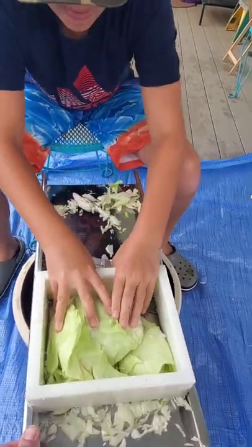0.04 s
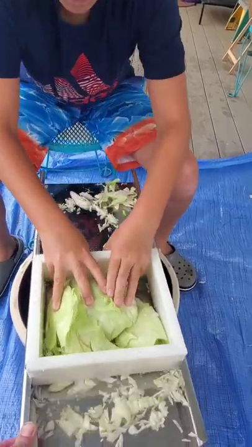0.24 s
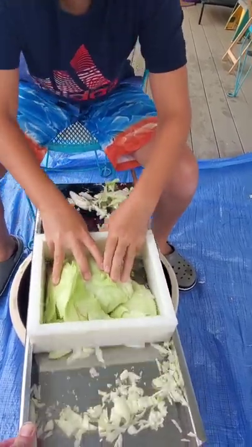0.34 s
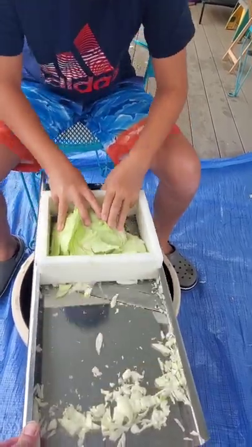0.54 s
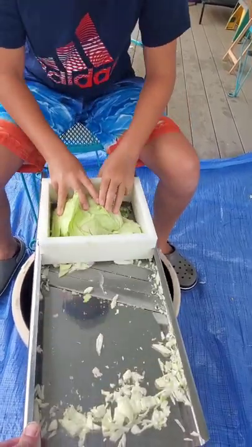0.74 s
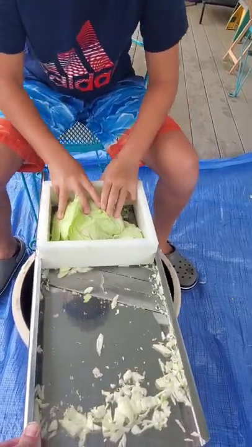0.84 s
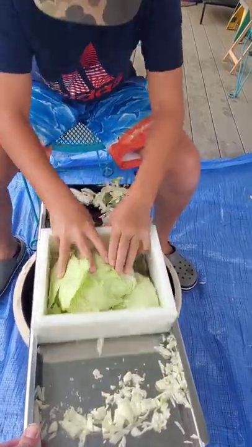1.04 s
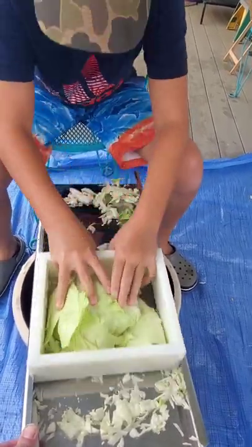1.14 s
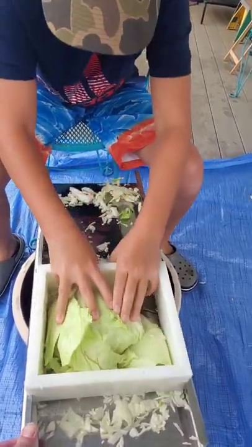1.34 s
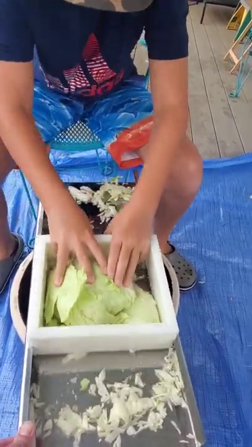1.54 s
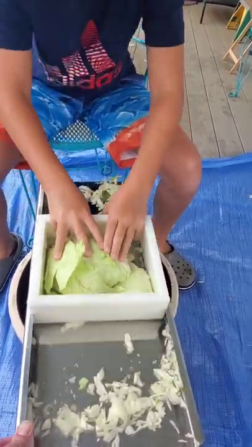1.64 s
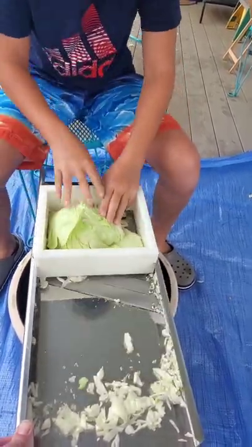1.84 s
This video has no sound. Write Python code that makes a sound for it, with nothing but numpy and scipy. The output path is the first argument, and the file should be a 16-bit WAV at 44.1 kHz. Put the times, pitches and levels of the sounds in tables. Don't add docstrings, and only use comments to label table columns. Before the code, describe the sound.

Cabbage being shredded on a steel slicer, hollow knocks, rough sliding and crisp leafy crackle, close up

```python
import sys
import numpy as np
from scipy import signal
from scipy.fft import rfft, irfft
from scipy.io import wavfile
from scipy.ndimage import uniform_filter1d

SR = 44100
rng = np.random.default_rng(int(sys.argv[2]) if len(sys.argv) > 2 else 0)


def unload_wav(signal):
    wavfile.write(
        sys.argv[1],
        SR,
        np.round(np.clip(np.atleast_2d(signal).T, -1, 1) * 32767).astype(np.int16),
    )


def gain_from_db(level_db):
    decades = np.asarray(level_db, float) / 20
    return 10 ** decades


N = 83790

# time in seconds, slicing crackle in dB, tray rubbing in dB,
# tub rumble in dB, stand sway in dB.
BOX_MOTION = [(0, -45, -30, -32.5, 8.5), (.05, -48.5, -40.5, -41.5, 0), (0.099, -62.5, -44.5, -51, -7.5),
              (.20, -57, -43, -41.5, -4), (0.268, -53, -31, -29, -1), (.42, -50.5, -42, -40.5, 1),
              (.62, -48.5, -41, -40.5, 2.5), (.74, -53.5, -46.5, -42.5, -6), (.81, -65, -54.5, -56, -10.5),
              (0.889, -55, -49.5, -57, -10), (0.955, -39.5, -38.5, -39.5, 2),
              (1.111, -35.5, -30.5, -33.5, 4), (1.268, -43.5, -30.5, -28.5, -2.5),
              (1.363, -70.5, -59, -82, -15), (1.46, -65, -52, -51.5, -3), (1.54, -55.5, -47, -44.5, 0),
              (1.70, -51, -37, -40.5, 2.5), (1.9, -54.5, -56.5, -48, -2.5)]
# start in seconds, level in dB, contact in seconds,
# brightness in dB per octave, pitch of the free span in Hz.
TRAY_KNOCKS = [(.014, -31, 0.011, 7, 855), (.044, -29, 0.0066, 4, 707), (.118, -42, 0.0085, -1, 755),
               (.2235, -9, 0.0097, -2, 664), (.242, -18.5, 0.011, -4, 740), (.257, -23, 0.011, 1, 970),
               (.271, -19, 0.013, -1.5, 810), (.287, -27, 0.0079, -4, 764), (.348, -31, 0.012, 2, 770),
               (.374, -28.5, 0.016, 2.5, 887), (.385, -27, 0.0092, 2, 930), (.439, -31, 0.0082, -4, 920),
               (.494, -29.5, 0.0091, 4.5, 910), (.6025, -19, 0.011, -3, 791),
               (.727, -26.5, 0.0052, 9.5, 806), (.749, -30.5, 0.019, -2, 863), (.829, -41.5, .01, -8, 813),
               (.9035, -22, 0.0078, 4, 865), (.984, -22, 0.0086, 2.5, 757), (.994, -30, 0.0088, 0, 866),
               (1.055, -29, 0.013, 4, 747), (1.083, -21, .007, 0, 724), (1.103, -24.5, .015, 4, 830),
               (1.1275, -4, 0.011, 1.5, 798), (1.158, -17, 0.0047, 6, 736), (1.189, -17.5, 0.014, 0, 925),
               (1.211, -32, 0.012, -1, 756), (1.2518, -16, 0.016, 0.5, 776)]
# start in seconds, level in dB, contact in seconds,
# brightness in dB per octave, pitch of the free span in Hz.
RETURN_TICKS = [(1.375, -37, 0.005, -8, 772), (1.475, -40.5, 0.01, 6, 630), (1.502, -37.5, 0.01, 2, 727),
                (1.521, -34.5, 0.013, 8, 907), (1.573, -32, 0.0091, -4, 776), (1.6, -31, 0.0066, -2, 964),
                (1.626, -33, 0.013, -7, 907), (1.647, -28.5, 0.0095, 1, 746),
                (1.696, -31.5, 0.009, -10, 996), (1.726, -32.5, 0.0066, 2, 718),
                (1.817, -27.5, 0.0069, -2, 818), (1.865, -32.5, 0.014, -12, 823),
                (1.892, -35, 0.011, 4, 861)]
# start in seconds, level in dB, contact in seconds,
# brightness in dB per octave, pitch of the belly in Hz.
TUB_THUMPS = [(0.029, -30, 0.0029, -5, 181), (0.062, -27.5, 0.006, -3, 167), (0.153, -32.5, 0.0035, 0, 178),
              (0.223, -7.5, 0.0039, 2, 173.3), (0.251, -13, 0.004, 5, 162), (0.296, -26.5, 0.0041, -9, 154),
              (0.345, -39.5, 0.0045, 0, 151), (0.508, -23, 0.006, -7, 167), (0.597, -32, 0.0057, 6, 156),
              (0.725, -29.5, 0.0074, -1, 241), (0.987, -21.5, 0.0034, 4.5, 197),
              (1.064, -26.5, 0.0081, 1, 158), (1.099, -18.5, 0.0052, 2, 294),
              (1.128, -12, 0.0034, 1.5, 201), (1.143, -18.5, 0.0037, 7, 155),
              (1.159, -26.5, 0.0021, 11, 150), (1.207, -34.5, 0.0048, 13, 193),
              (1.252, -24, 0.0048, 4, 206.4), (1.313, -35.5, 0.0034, 2, 221), (1.377, -45, 0.003, 10, 324),
              (1.649, -28, 0.0059, 1, 165), (1.825, -27, 0.004, -2, 277), (1.849, -30.5, 0.004, 5, 173)]
# start in seconds, level in dB, length in seconds,
# share of thin crisp cracks from 0 to 1.
LEAF_SNAPS = [(0.088, -42.5, 0.031, 0.8), (0.128, -36.5, 0.026, 0.38), (0.2172, -18, 0.016, 0),
              (0.319, -29, 0.057, 0.2), (0.366, -25, 0.015, 0.1), (0.436, -38, 0.012, 0.3),
              (0.488, -20, 0.018, 0.4), (0.668, -35, 0.0057, 0.94), (0.6837, -29, 0.01, 1),
              (0.7016, -21, 0.016, 0.5), (.815, -47.5, 0.011, 1), (.857, -46, 0.015, 1),
              (1.083, -24.5, 0.027, 0.15), (1.172, -32, 0.014, 0.6), (1.225, -27, 0.011, 0),
              (1.508, -33.5, 0.009, 0.35), (1.591, -34.5, 0.018, 0.1), (1.755, -29, 0.015, 1)]
# centre in seconds, level in dB, pitch in Hz.
STAND_BUMPS = [
    (0.251, -17.5, 69),
    (1.151, -24, 92),
    (1.480, -21.5, 64),
    (1.598, -25.5, 70),
    (1.718, -28, 55.7),
]
# time in seconds, pitch in Hz, level in dB.
RIM_GROAN = [
    (.345, 158, -51),
    (.395, 163, -33),
    (.428, 165.8, -48),
    (.47, 166.3, -40),
    (.53, 163.1, -29.5),
    (.588, 159.6, -43.5),
    (.632, 162.8, -36.5),
    (.7, 184, -49),
]
# time in seconds, resonance in Hz, level in dB.
BLADE_GAP = [
    (1.0, 748, -50),
    (1.035, 950, -37),
    (1.06, 1097, -32.5),
    (1.085, 1397, -31),
    (1.1, 1694, -31.5),
    (1.125, 1920, -50),
]
# frequency in Hz, level in dB, T60 in seconds.
TRAY_MODES = [(690, 1.5, 0.053), (768, 1, 0.067), (862, 4, 0.023), (976, -5, 0.021), (1290, -3.5, 0.024),
              (1449, -3.5, 0.018), (1590, -7.5, 0.036), (1906, -15, 0.03), (2170, -9, 0.016),
              (2380, -12.5, 0.032), (2840, -20.5, 0.039), (2984, -24, 0.06), (4250, -16, 0.0055)]
# frequency in Hz, level in dB, T60 in seconds.
TUB_MODES = [(122, -12, 0.12), (163.4, -1, 0.13), (193, -5.5, 0.11), (263.2, -5.5, 0.11),
             (293.5, -9.5, 0.096), (377, -9.5, 0.055)]
# frequency in Hz, level in dB per Hz.
LEAF_TONE = [(880, 4.5), (1500, -1.5), (2410, 2), (5280, -8), (11700, -14.5), (14600, -12.5),
             (16000, -21.5)]
# frequency in Hz, level in dB.
AIR_TONE = [(30, 1), (100, -8), (250, 9), (520, -2), (800, -13), (2000, -47), (6000, -42), (15000, -45)]
# frequency in Hz, side minus mid in dB.
STEREO_WIDTH = [(40, -3), (90, -6), (170, -19), (350, -12), (700, -8), (1400, 0), (2800, -2.5), (5600, 0)]


def unit(x):
    return x / np.sqrt(np.mean(x ** 2))


def on_log(table, hz):
    table = np.array(table, float)
    return np.interp(np.log(np.maximum(hz, 1)), np.log(table[:, 0]), table[:, 1])


def colour(x, table):
    return irfft(rfft(x) * gain_from_db(on_log(table, np.fft.rfftfreq(N, 1 / SR))), N)


def high(x, hz, order=2):
    return signal.sosfilt(signal.butter(order, hz, "high", fs=SR, output="sos"), x)


def spread(mid, side):
    return mid + colour(side, STEREO_WIDTH) * np.array([[1], [-1]])


def lean(hz):
    return np.arctan(gain_from_db(on_log(STEREO_WIDTH, hz))) * np.array([[1], [-1]])


def walk(rate):
    hold = int(SR / rate)
    steps = np.repeat(rng.standard_normal(N // hold + 1), hold)
    return 1.3 * uniform_filter1d(uniform_filter1d(steps, hold), hold)[:N]


def slide(index):
    rows = np.array(BOX_MOTION)
    return gain_from_db(np.interp(np.arange(N) / SR, rows[:, 0], rows[:, index]))


def clicks(per_s, spread_db):
    chance, sign, size = rng.random((3, N))
    size_db = np.minimum(-spread_db * np.log(1 - size), 4 * spread_db)
    return unit((chance < per_s / SR) * np.sign(sign - .5) * gain_from_db(size_db))


def bursts(rows, gains, rise, carrier, hz=0):
    out = np.zeros(carrier.shape)
    for row, gain in zip(rows, gains):
        start, length = int(row[0] * SR), row[2]
        t = np.arange(min(int(.15 * SR), N - start)) / SR
        shape = (1 - np.exp(-(t / (rise * length)) ** 2)) * np.exp(-3 * t / length)
        shape = shape / shape.max()
        bit = shape * carrier[..., start:start + len(t)]
        energy = np.sum(bit ** 2) / (bit.size / len(t))
        if hz:
            at_pitch = abs(np.sum(bit * np.exp(-2j * np.pi * hz * t))) ** 2
            energy = (energy + 3 * at_pitch) / 4
        level = gain * gain_from_db(row[1]) * np.sqrt(np.sum(shape ** 2) / energy)
        out[..., start:start + len(t)] += level * bit
    return out


def ring(modes, hits, hit_db, rise, jolt, rubbing):
    struck, rubbed = 0, 0
    scatter_db = 3.5 * rng.standard_normal((len(hits), len(modes)))
    brightness = np.clip(np.array(hits)[:, 3], -8, 8)
    for k, (hz, db, t60) in enumerate(modes):
        pole = np.exp(2j * np.pi * hz / SR - np.log(1000) / (t60 * SR))
        turn = np.exp(1j * (-1) ** k * lean(hz))
        gains = gain_from_db(scatter_db[:, k] + brightness * np.log2(hz / modes[1][0]))
        force = bursts(hits, gains, rise, jolt, hz)
        struck = struck + gain_from_db(db) * (turn * signal.lfilter([1], [1, -pole], force)).imag
        rubbed = rubbed + gain_from_db(db) * (turn * signal.lfilter([1], [1, -pole], rubbing())).imag
    return gain_from_db(hit_db) * struck, unit(rubbed)


def own_note(hits, db, t60, rise_s):
    out = np.zeros((2, N))
    for s, hit_db, _, _, hz in hits:
        start = int(s * SR)
        t = np.arange(min(int(.2 * SR), N - start)) / SR
        envelope = gain_from_db(db + hit_db - 60 * t / t60) * (1 - np.exp(-t / rise_s))
        out[:, start:start + len(t)] += envelope * np.sin(2 * np.pi * hz * t + lean(hz))
    return out


def air():
    mid, side = [colour(rng.standard_normal(N), AIR_TONE) for _ in range(2)]
    return gain_from_db(-54 + 1.5 * walk(4.4)) * unit(spread(mid, side))


def yard(board):
    t, t60_s = np.arange(N) / SR, 0.097
    echo = rng.standard_normal((2, N)) * gain_from_db(-60 * np.minimum(t, 1) / t60_s) * (t > .004)
    mid, side = signal.fftconvolve(board, unit(echo) / np.sqrt(N), axes=1)[:, :N]
    return gain_from_db(-10) * spread(mid, side)


def stand():
    t, bumps = np.arange(N) / SR, 0
    for s, db, hz in STAND_BUMPS:
        bumps = bumps - gain_from_db(db) * np.sin(2 * np.pi * hz * (t - s)) * np.exp(-((t - s) * hz / 0.42) ** 2)
    sway_tone = [(18, -10), (45, 2), (90, 7.5), (160, -26.0)]  # Hz, dB
    sway = np.array([unit(colour(rng.standard_normal(N), sway_tone)) for _ in range(2)])
    return bumps * np.array([[1.15], [.85]]) + gain_from_db(-43) * slide(index=4) * sway


def groan():
    t, rows = np.arange(N) / SR, np.array(RIM_GROAN)
    fade = np.clip(np.minimum(t - rows[0, 0], rows[-1, 0] - t) / .02, 0, 1)
    hz = np.interp(t, rows[:, 0], rows[:, 1]) * (1 + 0.012 * walk(8.2))
    level = gain_from_db(np.interp(t, rows[:, 0], rows[:, 2]) + walk(23.2))
    return np.sqrt(2) * fade * level * np.sin(2 * np.pi * np.cumsum(hz) / SR)


def gap():
    t, rows, width_hz = np.arange(N) / SR, np.array(BLADE_GAP), 180
    low_pass = signal.butter(2, width_hz / 2, fs=SR, output="sos")
    grit = unit(signal.sosfilt(low_pass, clicks(400, 4.7)))
    hz = np.interp(t, rows[:, 0], rows[:, 1])
    db = np.interp(t, rows[:, 0], rows[:, 2], left=-120, right=-120)
    return gain_from_db(db) * grit * np.sin(2 * np.pi * np.cumsum(hz) / SR)


def tub():
    grit = rng.standard_normal(N) * gain_from_db(1.6 * walk(25.6))
    struck, rubbed = ring(TUB_MODES, TUB_THUMPS, -25, 0.15, np.ones(N), lambda: grit)
    struck = struck + own_note(TUB_THUMPS, -1, t60=0.11, rise_s=0.004)
    return high(struck + gain_from_db(1.5) * slide(index=3) * rubbed, 135, order=4)


def leaves():
    tone = [(600, -54)] + list(LEAF_TONE)
    grain = np.array([unit(colour(clicks(9000, 3.5), tone)) for _ in range(2)])
    swell = gain_from_db(5.5 + walk(31.08) + 1.38 * walk(89.83)) * slide(index=1)
    crisp = np.array(LEAF_SNAPS)[:, 3]
    uneven = grain * gain_from_db(5.0 * walk(200))
    snaps = bursts(LEAF_SNAPS, 1 - crisp, 0.83, uneven)
    snaps = snaps + bursts(LEAF_SNAPS, crisp, 0.83, high(uneven, 4070))
    return grain * swell + gain_from_db(-8.5) * snaps


def tray():
    hits = list(TRAY_KNOCKS) + list(RETURN_TICKS)
    rise, damped_s, likeness = .08, .036, 0.38
    rattle = clicks(6000, 4.25)
    grit = clicks(1500, 4.5) * gain_from_db(1.1 * walk(59.1))

    def rubbing():
        return (likeness * grit + (1 - likeness) * rng.standard_normal(N)) * gain_from_db(4.5 * walk(12.0))

    modes = [(hz, db, min(t60, damped_s)) for hz, db, t60 in TRAY_MODES]
    struck, rubbed = ring(modes, hits, -26.5, rise, rattle, rubbing)
    crack = unit(colour(np.array([rattle, np.roll(rattle, 3)]), LEAF_TONE))
    struck = high(struck, 950) + gain_from_db(-23.5) * bursts(hits, np.ones(len(hits)), rise / 2, crack)
    struck = struck + own_note(TRAY_KNOCKS, -0.7, t60=0.049, rise_s=0.00084)
    struck = struck + own_note(RETURN_TICKS, 1.8, t60=0.049, rise_s=0.0044)
    return high(struck + gain_from_db(-1.75) * slide(index=2) * rubbed, 610, order=4)


def scene():
    board = tray() + tub() + groan() + gap() + leaves()
    return board + yard(board) + stand() + air()


def top_cut(x):
    return signal.sosfilt(signal.butter(12, 15830, fs=SR, output="sos"), x)


def record(dry):
    rounded = np.tanh(high(dry, 45.6))
    top = signal.ellip(8, .2, 60, 15750, fs=SR, output="sos")
    return top_cut(signal.sosfilt(top, rounded))


dry = scene()
out = record(dry)
unload_wav(out)
```